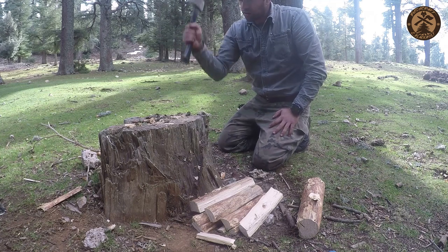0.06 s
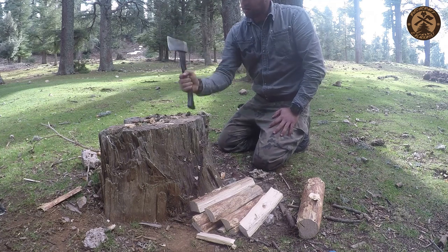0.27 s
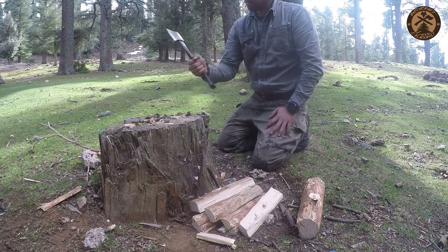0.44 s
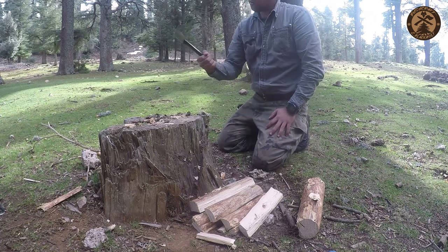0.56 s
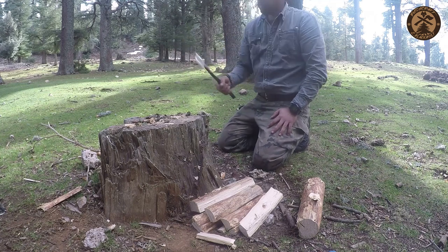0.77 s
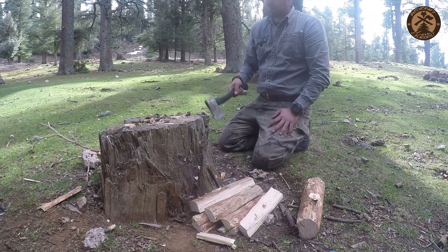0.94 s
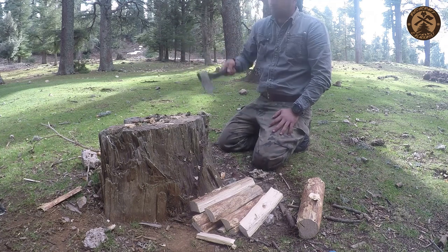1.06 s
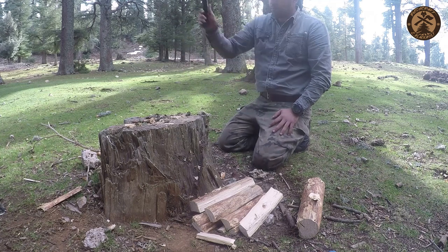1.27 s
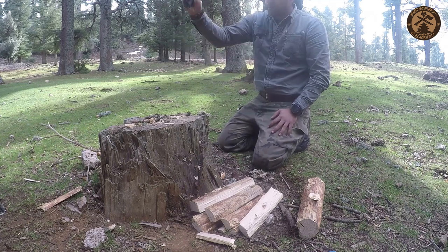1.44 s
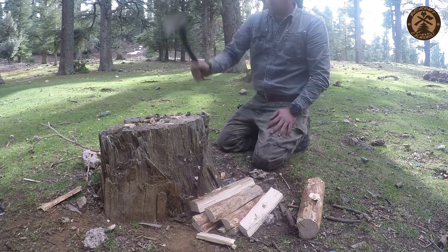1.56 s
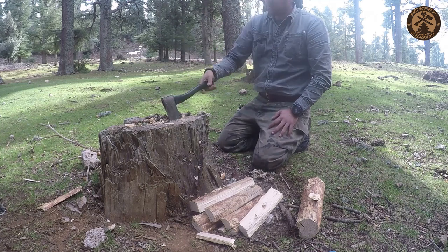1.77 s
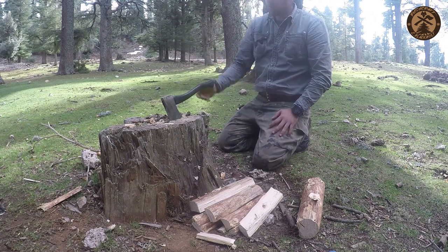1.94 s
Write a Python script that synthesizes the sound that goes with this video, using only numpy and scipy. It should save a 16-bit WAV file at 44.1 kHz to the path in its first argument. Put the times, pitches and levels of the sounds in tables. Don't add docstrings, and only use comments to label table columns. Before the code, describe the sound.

Two hard hatchet blows on a wooden stump ring through woods, with low wind buffeting between

```python
import sys
import numpy as np
from scipy import signal
from scipy.fft import rfft, irfft
from scipy.io import wavfile
from scipy.ndimage import uniform_filter1d

SR = 44100
rng = np.random.default_rng(int(sys.argv[2]) if len(sys.argv) > 2 else 0)


def put_to_file(sound):
    columns = np.atleast_2d(sound).T
    safe = np.clip(columns, -1, 1)
    whole_steps = np.round(safe * 32767)
    wavfile.write(sys.argv[1], SR, whole_steps.astype(np.int16))


def rack_gain(trim_db):
    fader = np.asarray(trim_db, float)
    return 10 ** (fader / 20)


N = 88200


def curve(table, hz):
    table_hz, value = np.array(table).T
    return np.interp(np.log(np.maximum(hz, 1)), np.log(table_hz), value)


def colour(x, table):
    gain = rack_gain(curve(table, np.fft.rfftfreq(8192, 1 / SR)))
    cepstrum = irfft(np.log(gain))
    cepstrum[1:4096] *= 2
    cepstrum[4097:] = 0
    response = irfft(np.exp(rfft(cepstrum)))
    return signal.fftconvolve(x, response)[:len(x)]


def unit(x):
    return x / np.sqrt(np.mean(x ** 2))


def walk(rate_hz, size):
    k = int(SR / rate_hz)
    held = rng.standard_normal(size // 8)[np.arange(size) // k]
    return unit(uniform_filter1d(uniform_filter1d(held, k), k))


def ring(x, modes):
    out = 0
    turn = 2j * np.pi * np.arange(len(x)) / SR
    for hz, db, t60_s in modes:
        pole = np.exp(2j * np.pi * hz / SR - np.log(1000) / (t60_s * SR))
        drive = abs(np.sum(x * np.exp(-turn * hz)))
        out = out + rack_gain(db) * signal.lfilter([1], [1, -pole], x).imag / drive
    return out


def blow(hits, modes, rings, thud, lag_s, crack, crack_db):
    rise_s, strike_fade_s, shove_s = .0008, 0.00064, 0.00038
    first_s = hits[0][0]
    start = int(first_s * SR) - 1000
    t = (start + np.arange(SR // 4)) / SR
    out = 0
    for s, db, hold_ms, fade_ms in hits:
        spray = rng.standard_normal(len(t)) * rack_gain(2.0 * rng.exponential(size=len(t)))
        rise = np.clip((t - s) / rise_s, 0, 1) ** 2
        crush = rise * np.exp(-np.maximum(t - s - hold_ms / 1000, 0) / (fade_ms / 1000))
        strike = spray * rise * np.exp(-np.maximum(t - s, 0) / strike_fade_s)
        cracking = rack_gain(crack_db) * unit(colour(spray, crack)) * crush
        out = out + rack_gain(db) * (ring(strike, modes) + cracking)
    shove = np.exp(-.5 * ((t - first_s - lag_s) / shove_s) ** 2)
    tap = np.diff(1. * (t > first_s + rise_s), prepend=0)
    out = out + ring(shove, thud) + ring(tap, rings)
    return np.pad(out, (start, N))[:N]


# (time [s], level [dB], crush hold [ms], crush fade [ms])
BUTT_HITS = [
    (.2060, 4.5, 3.6, 1.5),
    (.2135, -14, 3.0, 1.4),
    (.2200, -22, 1.2, 1.2),
]
# (frequency [Hz], level [dB], t60 [s])
BUTT_MODES = [(643, -20.5, .02), (740, -15.5, 0.029), (1283, -14.5, .012), (1503, -13, .012),
              (1792, -13, 0.02), (2057, -11, .016), (2610, -7, .02), (3230, -8.5, 0.0084), (3550, -6, .012),
              (3800, -6.5, .014), (4100, -8, 0.01), (4490, -7.5, .016), (11640, -25.5, .018)]
# (frequency [Hz], level [dB], t60 [s])
BUTT_RINGS = [(3934, -28, .15), (7020, -48, .2), (7130, -50, .15), (11400, -56, .14)]
# (frequency [Hz], level [dB], t60 [s])
BUTT_THUD = [(143, -6, 0.05), (250, -7.5, 0.025), (62, -15, 0.028)]
# (frequency [Hz], level [dB])
BUTT_CRACK = [(400, -30), (1200, -14.5), (2600, -4), (3800, 0), (4800, -3.5), (6000, -16.5), (10000, -29),
              (15000, -33)]


def butt_blow():
    return blow(BUTT_HITS, BUTT_MODES, BUTT_RINGS, BUTT_THUD, lag_s=.0034, crack=BUTT_CRACK, crack_db=-8)


# (time [s], level [dB], crush hold [ms], crush fade [ms])
BLADE_HITS = [
    (1.6959, 2, 2.4, .9),
    (1.7012, -14, 1.5, 1.3),
    (1.6765, -54, .5, 1.0),
    (1.691, -60, .5, 1.0),
]
# (frequency [Hz], level [dB], t60 [s])
BLADE_MODES = [(655, -15, 0.017), (893, -22, 0.012), (1094.7, -15.5, 0.027), (1250, -5, .01),
               (1415, -4.5, 0.02), (1620, -9.5, 0.0049), (2029, -27, 0.0072), (2360, -31.5, 0.044),
               (2627, -27.5, 0.031), (3480, -9.5, 0.014), (4750, -11, 0.005), (5100, -6.5, 0.014),
               (5400, -14, 0.0033), (8200, -61.5, 0.012)]
# (frequency [Hz], level [dB], t60 [s])
BLADE_RINGS = [(521, -15, .066), (500, -27, .09)]
# (frequency [Hz], level [dB], t60 [s])
BLADE_THUD = [(146, -9, .04), (246, -15, .03), (62, -22.5, 0.17)]
# (frequency [Hz], level [dB])
BLADE_CRACK = [(350, -22), (750, -0.5), (1400, -1.5), (2800, -9), (5000, -5.5), (6500, -19), (12500, -29.5),
               (15000, -28.5)]


def blade_blow():
    return blow(BLADE_HITS, BLADE_MODES, BLADE_RINGS, BLADE_THUD, lag_s=.0043, crack=BLADE_CRACK, crack_db=-8.5)


# (frequency [Hz], t60 [s])
TRUNKS_T60 = [(150, .9), (1300, 1), (5000, .7), (12000, 0.66)]


def forest(blow_s, db, tone):
    first_trunk_s, rise_s = .016, .012
    near_db, near_s = 5.5, 0.18
    t = np.arange(N) / SR - blow_s
    since = np.maximum(t, 0)
    patchy = 1.5 * walk(160, N)
    near = near_db * np.exp(-since / near_s)
    noise = unit(colour(rng.standard_normal(N), tone))
    echo = 0
    for hz in 130 * 2 ** np.arange(0, 7, .5):
        sos = signal.butter(2, [hz / 1.19, hz * 1.19], "band", fs=SR, output="sos")
        band = signal.sosfilt(sos, noise)
        flicker = .8 * walk(120, N)
        echo = echo + band * rack_gain(near + patchy + flicker - 60 * since / curve(TRUNKS_T60, hz))
    return rack_gain(db) * echo * np.clip((t - first_trunk_s) / rise_s, .1, 1) * (t > 0)


# (frequency [Hz], level [dB])
BUTT_ECHO = [(200, -2), (600, -13), (1000, -3), (2200, -1), (4200, -0.5), (5600, -9.5), (7100, -17.5),
             (14000, -38)]
BLADE_ECHO = [(170, 3), (600, -15.5), (1350, -0.5), (1900, -14), (4200, -11), (5200, -6.5), (6300, -21.5),
              (14000, -39)]


def echoes():
    butt = forest(BUTT_HITS[0][0], -38, BUTT_ECHO)
    blade = forest(BLADE_HITS[0][0], -38.5, BLADE_ECHO)
    earlier = forest(-0.083, -46.5, BUTT_ECHO)
    return butt + blade + earlier


# (time [s], level [dB])
GUSTS = [(0.0, -38.5), (0.13, -37.5), (0.25, -31), (0.29, -33), (0.43, -36), (0.7, -40.5), (0.99, -37),
         (1.13, -35.5), (1.27, -45), (1.49, -41.5), (1.6, -36), (1.65, -37.5), (1.88, -51), (2.0, -56.5)]
# (frequency [Hz], level [dB])
WIND = [(15, -7), (35, 5.5), (55, -2.5), (80, -17.5), (120, -30), (200, -33.5), (400, -64)]
# (time [s], level [dB], frequency [Hz])
BUFFETS = [(0.064, -27.5, 46.3), (0.157, -48, 52.7), (0.301, -19, 35.2), (0.413, -26, 51),
           (0.431, -22.5, 42), (0.909, -28, 36.3), (1.005, -26.5, 38), (1.061, -13, 54.4),
           (1.084, -20, 74.4), (1.102, -24.5, 81), (1.112, -21, 46.3), (1.133, -18.5, 62),
           (1.49, -30.5, 41.7), (1.513, -26.5, 37), (0.624, -31.5, 44.5), (0.749, -32.5, 42),
           (1.445, -28.5, 37.4), (1.573, -25.5, 39.2)]


def wind(t):
    gust_s, gust_db = np.array(GUSTS).T
    gust = rack_gain(np.interp(t, gust_s, gust_db) + 2.0 * walk(11, N))
    out = unit(colour(rng.standard_normal(N), WIND)) * gust
    for s, db, hz in BUFFETS:
        cycles = (t - s) * hz
        bump = np.exp(-(np.where(cycles < 0, cycles / 0.2, cycles / .5)) ** 2)
        out = out + rack_gain(db) * np.cos(2 * np.pi * cycles - .4) * bump
    return out


# (time [s], length [s], level [dB])
CREAKS = [
    (1.4815, .002, -60),
    (1.4925, .02, -52),
    (1.5155, .002, -54),
    (1.592, .006, -60),
    (1.6045, .002, -56),
]
# (frequency [Hz], level [dB], t60 [s])
GRIP_MODES = [(2170, 1, .022), (2680, -4, .012), (3200, 0, .016)]


def grip():
    slip_hz = 245
    slips = np.zeros(N)
    tick = ring(signal.unit_impulse(SR // 20), GRIP_MODES)
    for s, length_s, db in CREAKS:
        chance = rng.standard_normal((12, 2))
        times_s = s + (np.arange(12) + .04 * chance[:, 0]) / slip_hz
        keep = times_s < s + length_s
        slips[(times_s[keep] * SR).astype(int)] += rack_gain(db + 1.1 * chance[keep, 1])
    return signal.fftconvolve(slips, tick)[:N]


# (time [s], length [s], level [dB], centre [Hz], width [Hz])
RUSTLES = [
    (1.296, .006, -66, 3200, 2500),
    (1.364, .004, -66, 12200, 4000),
    (1.625, .022, -70, 3700, 800),
    (1.492, .024, -68, 4300, 2400),
]


def sleeve(t):
    out = 0
    noise = rng.standard_normal(N)
    for s, length_s, db, hz, width_hz in RUSTLES:
        sos = signal.butter(3, [hz - width_hz / 2, hz + width_hz / 2], "band", fs=SR, output="sos")
        puff = np.clip(np.minimum(t - s, s + length_s - t) / 0.00067 + .5, 0, 1)
        out = out + rack_gain(db) * unit(signal.sosfilt(sos, noise)) * puff
    return out


# (time [s], length [s], level [dB], start [Hz], end [Hz])
CHIRPS = [
    (.385, .03, -68, 5750, 5600),
    (.595, .025, -68, 3500, 3400),
    (.748, .018, -71, 3900, 3900),
    (1.886, .072, -63, 4650, 3770),
]


def birds(t):
    glide_s = .017
    out = 0
    for s, length_s, db, start_hz, end_hz in CHIRPS:
        hz = end_hz + (start_hz - end_hz) * np.exp(-np.maximum(t - s, 0) / glide_s)
        shape = np.sin(np.pi * np.clip((t - s) / length_s, 0, 1)) ** .4
        out = out + rack_gain(db + walk(89, N)) * shape * np.sin(2 * np.pi * np.cumsum(hz) / SR)
    return out


# (frequency [Hz], level [dB])
HUSH = [(150, -24.5), (250, -8), (427, -9), (768, -11), (897, -13), (1140, -14), (1250, -14), (3890, -16.5),
        (15500, -32)]


def hush(t):
    whine_hz, whine_db = 8705, -85
    leaves = unit(colour(rng.standard_normal(N), HUSH)) * rack_gain(-64.5 + 0.25 * walk(4.1, N))
    return leaves + rack_gain(whine_db) * np.sin(2 * np.pi * whine_hz * t)


def scene():
    t = np.arange(N) / SR
    blows = butt_blow() + blade_blow() + echoes()
    return (blows + wind(t) + grip() + sleeve(t) + birds(t) + hush(t))[None]


def low_pass(x):
    return signal.sosfilt(signal.butter(12, 16480, fs=SR, output="sos"), x)


def record(dry):
    ceiling, knee = .84, 3.5
    low_cut = signal.butter(1, 12, "high", fs=SR, output="sos")
    high_cut = signal.ellip(8, .3, 50, 15200, fs=SR, output="sos")
    clipped = dry / (1 + np.abs(dry / ceiling) ** knee) ** (1 / knee)
    mix = signal.sosfilt(high_cut, signal.sosfilt(low_cut, clipped))
    return low_pass(mix)


dry = scene()
out = record(dry)
put_to_file(out)
```